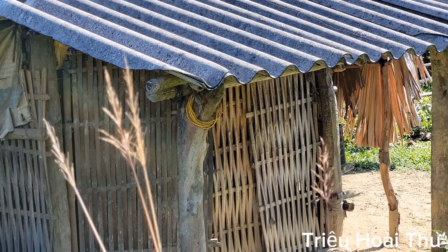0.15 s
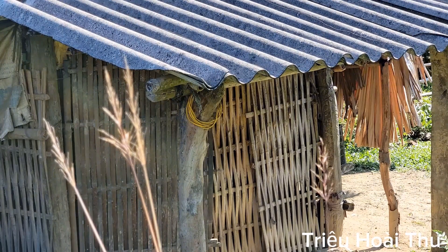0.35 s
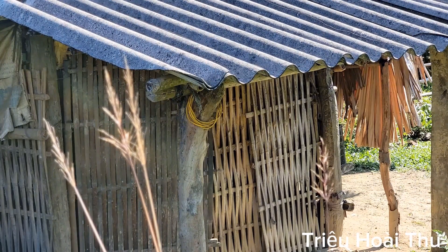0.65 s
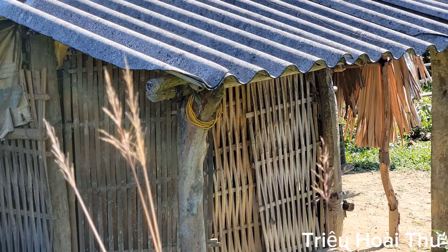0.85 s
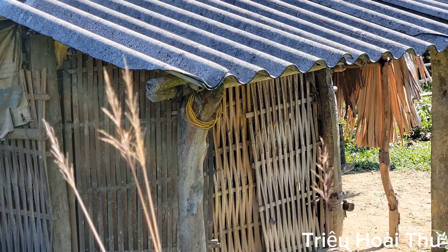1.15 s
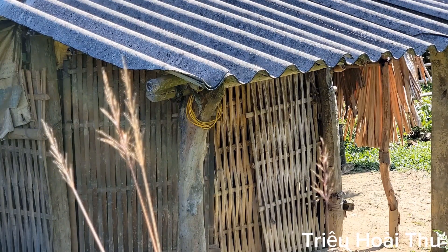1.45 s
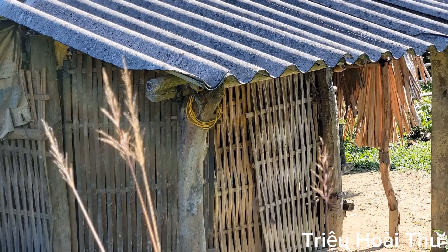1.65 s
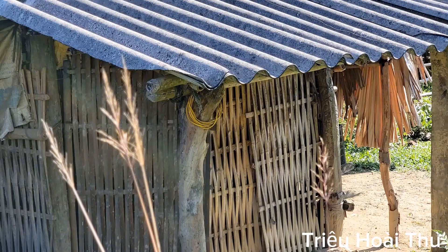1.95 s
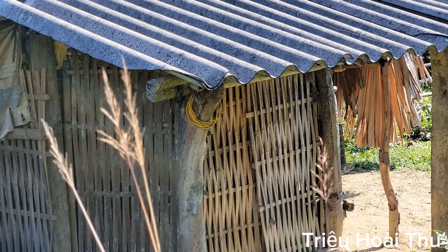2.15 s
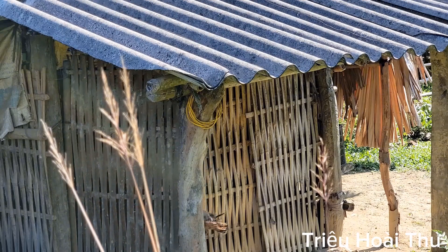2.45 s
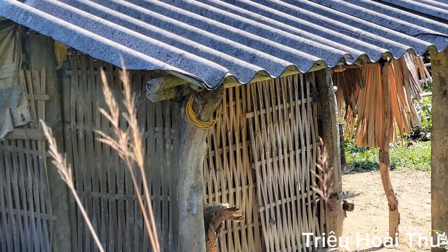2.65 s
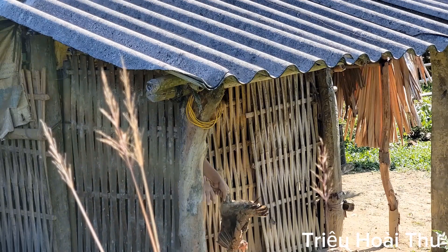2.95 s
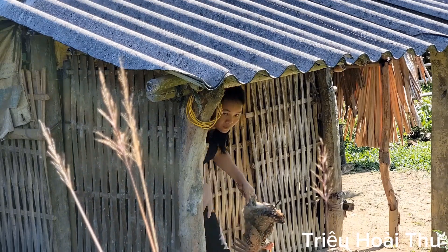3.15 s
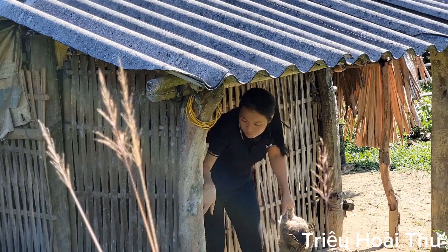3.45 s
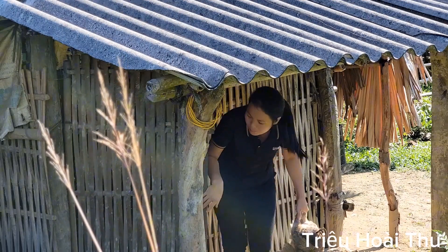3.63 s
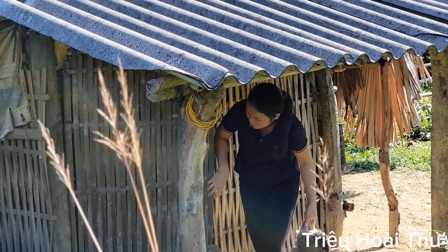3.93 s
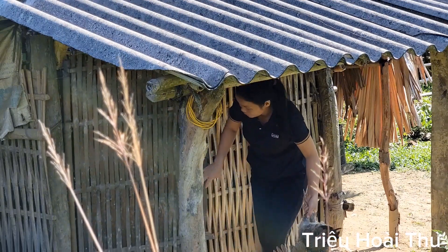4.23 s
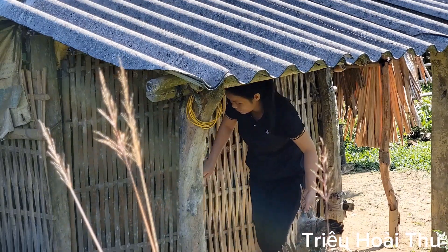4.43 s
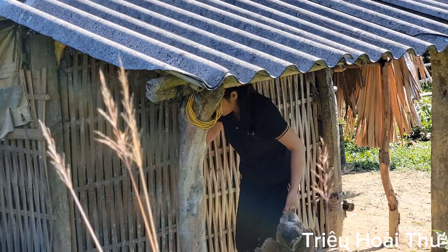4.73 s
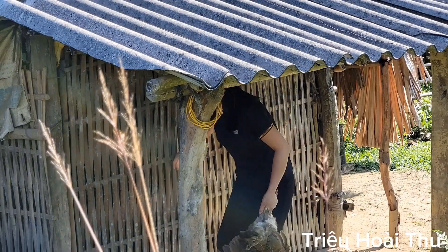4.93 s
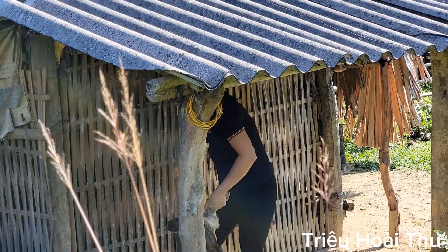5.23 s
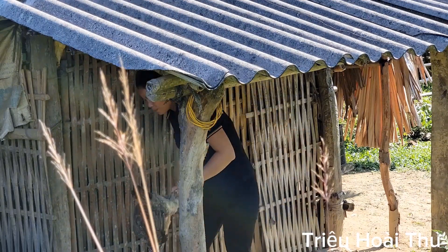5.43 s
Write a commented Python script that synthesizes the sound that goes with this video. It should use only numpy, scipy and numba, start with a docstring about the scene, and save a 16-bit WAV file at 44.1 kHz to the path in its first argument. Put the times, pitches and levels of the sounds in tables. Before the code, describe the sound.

A hen carried from a wicker hut squawks six times. A clipped rasp opens, then five drawn-out calls swell from scratchy noise into a clear nasal cry and mostly roughen again. Tiny dry rustles precede the last, loudest squawk, which is cut off at the end. Quick echoes off posts and sheet roof surround it; soft hiss, low rumble and faint insects lie beneath. The stereo microphone is fairly close outdoors.

```python
"""A hen carried out of a wicker hut squawks six times: pulses of uneven spacing ring her airway as a rasp,
a stack of whole-multiple partials makes the clear voice, and each squawk crossfades between the two.
Short puffs of noise rustle just before the last squawk, which splits into strong and weak cycles.
Single echoes off posts and a sheet roof and a noise tail for the hut follow hen and rustle;
throughout, coloured noise gives hiss and rumble, resonated noise gives insects and a swelling hum."""
import sys
import numpy as np
from scipy import signal
from scipy.fft import rfft, irfft
from scipy.io import wavfile
from numba import njit

SR = 44100
rng = np.random.default_rng(int(sys.argv[2]) if len(sys.argv) > 2 else 0)


def generate_wav(sig):
    """Save sig (samples, or channels by samples) to the path in sys.argv[1] as 16-bit PCM at SR."""
    pcm = np.round(np.clip(np.atleast_2d(sig).T, -1, 1) * 32767).astype(np.int16)
    wavfile.write(sys.argv[1], SR, pcm)


N = 246078

# one list a squawk: (time [s], pitch [Hz], level [dB], rasp over clear voice [dB], beak gape [0 shut, 1 wide])
SQUAWKS = [
    [(0, 575, -22.5, 30, 0.081), (.04, 572.7, -29, 35.5, 0.11), (.07, 557, -37, 30, 0.012)],
    [(.44, 568.3, -46.5, 25.5, 0.064), (.47, 615, -34, 30.5, .15), (.6, 624.3, -30, 23.5, 0.51),
     (.65, 611, -28, -6, 0.68), (.7, 596, -26, -10.5, .9), (.76, 616.7, -28, -11, 1.1),
     (.84, 602.2, -21.5, -17, 0.61), (.9, 589, -25, -17, 1), (.92, 609.3, -24.5, -6, .5),
     (1.04, 577, -27, 8.5, .5), (1.1, 588.5, -27.5, 16, 0.32), (1.14, 571, -36.5, 10.5, 0.0)],
    [(1.495, 595.4, -43, 22, 0.46), (1.55, 625.3, -31, 31, 0.44), (1.64, 588, -31.5, 9.5, .9),
     (1.68, 573, -28, -19.5, 1.2), (1.76, 573.1, -26, -30.5, 0.98), (1.82, 564.6, -23.5, -40, 0.86),
     (1.875, 556.5, -22.5, -34, 1.7), (1.895, 571.7, -26, -1.5, 1.0), (1.97, 564.3, -26.5, 4, .8),
     (2.04, 564.5, -22.5, 8, .4), (2.1, 558.7, -21.5, 20, 0.17), (2.16, 555.9, -26, 17, 0.14),
     (2.2, 548.5, -33.5, 9, 0.016)],
    [(2.605, 585.4, -40, 23.5, 0.21), (2.65, 655, -36.5, 17.5, .4), (2.76, 661.5, -31, 22, .6),
     (2.835, 594.2, -26.5, 6, .8), (2.855, 585, -27.5, -35, 1.7), (2.9, 591, -25.5, -43, 1.1),
     (2.96, 590.5, -25.5, -33.5, 1.4), (3.085, 571.7, -23, -26.5, 1), (3.11, 580, -26, 10.5, .8),
     (3.2, 563.7, -28.5, -7.5, .8), (3.27, 548.6, -28, 2, .5), (3.31, 533, -39, 3, 0.0)],
    [(3.74, 615, -44.5, 11.5, 0.55), (3.88, 662.2, -38, 4.5, .9), (4.01, 580.5, -30, 1.5, 1.0),
     (4.04, 569.8, -29, -19, 1.2), (4.1, 557.9, -28, -23, 1.2), (4.19, 558, -29, -38, 1.1),
     (4.26, 561.2, -28.5, -12, 1.1), (4.35, 551.4, -27, -14.5, 1), (4.41, 541, -30, -11.5, .9),
     (4.45, 529.2, -34.5, -0.5, .4), (4.465, 511.4, -34.5, 9.5, 0.0)],
    [(5.02, 522, -41.5, 28, .3), (5.12, 644.4, -33, 27.5, 0.77), (5.18, 694, -32, 19.5, .8),
     (5.24, 585.3, -28, 7.5, 0.96), (5.29, 553, -27, -5.5, 1.28), (5.305, 566, -20, -35, 0.69),
     (5.33, 566.2, -18.5, -46.5, 1.7), (5.38, 561.2, -19, -30, 0.85), (5.41, 557.2, -22.5, -6, 0.81),
     (5.44, 567.2, -18, -13.5, 1.24), (5.48, 559.2, -18.5, -10, 1.1), (5.52, 540.8, -16, -9.5, 0.72),
     (5.58, 555.3, -18, -26, 1)],
]
# lapses of the clear voice into rasp: (start [s], length [s], extra rasp [dB])
SLIPS = [(1.825, 0.027, 22.5), (2.99, 0.063, 13), (4.219, 0.017, 23), (4.295, 0.024, 10)]
# colour at COLOUR_HOLD_S, one row a squawk, as the hen is turned:
# (windpipe hum [dB], partials 1, 2, 3, 4, 5, 6 [dB each], upper partials [dB])
COLOUR = [(-17.5, -20, -13, -15, -1, -26, -7, -16), (-30, -18.5, -6.5, -9.5, -6, -21.5, -4, -18.5),
          (-22.5, -12, -8.5, -6, -5.5, -27, -8.5, -18.5),
          (-28.5, -34, -7.5, -6.5, -2.5, -11.5, -7.5, -15.5),
          (-7, -6.5, -12.5, -5.5, -6, -17.5, -4.5, -17.5), (-22.5, -21, -15, -5.5, -4, -22, -13.5, -23)]
# drift of that colour within the squawk: (same columns as COLOUR [dB/s])
COLOUR_DRIFT = [(-5, 2, 3.5, 5, 5, 5, 5, 5), (-52, -31.5, 35.5, -18, -19.5, -15, -2.5, -18),
                (-26, 15.5, 1, -1.5, -13, -60.5, -33, -22.5), (-25, 52, 6, -25, -8, -26.5, -35, 2.5),
                (-14.5, -1, 14, -2, 19.5, -46.5, -17, -2), (-26, 41, -60.5, 49, 3, -33, -25, -3)]
# gain from shut to wide beak: (partials 1, 2, 3, 4, 5, 6 [dB each], upper partials [dB])
GAPE_GAIN_DB = (-3.1, -6.5, 0, 1, -6.5, 1.5, 5.5)
# partials 7 and above: (frequency [Hz], level [dB])
UPPER_PARTIALS = [(4000, 2.5), (4700, 0.5), (5600, -2), (7000, -8.5), (8500, -8.5), (10000, -15.5),
                  (12000, -27), (15000, -30.5)]
# alternate strong and weak cycles: (time [s], depth [0-1])
DOUBLING = [(5.40, 0.0), (5.43, 0.25), (5.5, 0.07), (5.58, 0.16)]
# rasp offsets, one row a squawk: (chest [dB], gullet [dB], mouth [dB], beak hiss [dB], mouth shift [Hz])
RASP_COLOUR = [(-4, 3, 0, 5, 100.5), (3.5, 1.3, 0.7, 0.1, 38), (3, -2.5, 0, -2.2, 10),
               (-5, -3.8, -0.5, -0.5, 29.5), (8, -3.3, -0.9, -6, -93), (-17, -0.3, 0, -3.4, -32)]
# moving throat resonance: (time [s], centre [Hz])
THROAT = [(0, 1370), (.1, 1410), (.45, 1300), (.66, 1530), (.8, 1520), (.92, 1430), (1.08, 1420),
          (1.16, 1320), (1.5, 1350), (1.65, 1440), (2.0, 1520), (2.1, 1450), (2.22, 1370), (2.6, 1260),
          (2.66, 1390), (2.83, 1430), (3.12, 1480), (3.32, 1340), (3.74, 1180), (3.88, 1340), (4.02, 1410),
          (4.3, 1400), (4.46, 1490), (5.02, 1300), (5.12, 1390), (5.25, 1370), (5.41, 1580), (5.58, 1590)]
# moving mouth resonance: (centre, beak shut [Hz], centre, beak wide [Hz])
MOUTH_HZ = (3704, 3476)
# fixed mouth resonances: (centre [Hz], width per pass [Hz], level [dB])
FIXED_MOUTH = [(3080, 220, -2), (4800, 700, -13)]
# beak hiss resonances: (centre [Hz], width per pass [Hz], level [dB])
BEAK = [(6360, 3300, 6), (8280, 930, 1), (11600, 3500, -11), (14420, 3500, -9)]
# puffs before placement: (peak time [s], level [dB], t60 [s])
RUSTLE = [(4.676, -57.5, 0.04), (4.895, -54, 0.061), (4.9103, -44.5, 0.065), (4.9562, -51, 0.035)]
# rustle spectrum: (frequency [Hz], relative density [dB per Hz])
RUSTLE_COLOUR = [(290, -9), (500, -15.5), (2190, -12), (3150, -13.5), (3470, -4.5), (4050, -16),
                 (14000, -37)]
# direction of hen and rustle: (time [s], left over right [dB], left lag [samples])
SIDEWAYS = [(0, -2, -1.5), (.8, -0.5, -1), (1.3, -0.5, -1), (1.8, 1.5, 3.5), (2.2, -1, 0.5),
            (2.8, -0.5, 2.5), (3.3, -0.1, 2.5), (3.8, 0, 4), (4.3, -0.5, 3.5), (5.0, 0, 3),
            (5.58, -1, -0.2)]
# single reflections: (delay [s], level [dB], further delay on the left [samples])
ECHOES = [(.0021, -21.5, 6.0), (.0047, -34.5, -11), (.0083, -15, 15), (0.0155, -9, -5)]
# yard noise spectrum: (frequency [Hz], relative density [dB per Hz])
YARD = [(18, -35.5), (30, -4), (118, -2.5), (184, -13.5), (319, -14), (632, -19), (760, -17.5), (844, -24),
        (1910, -22.5), (3770, -28.5), (4780, -26), (5310, -31.5), (6380, -30.5), (16000, -49)]
# left-right likeness of yard noise: (frequency [Hz], likeness, clipped to 0-1)
LIKENESS = [(30, .88), (60, 0.87), (200, .8), (400, 0.26), (1000, -.1), (4000, -0.063), (12000, -1.2)]
# insect bands: (centre [Hz], first-pass width [Hz], level [dB], throb [dB])
INSECTS = [(4730, 150, -77.5, 4.5), (6520, 230, -75.5, 2)]
# low hum that swells: (time [s], level [dB])
HUM = [(0.0, -71.5), (3.88, -69.5), (4.1, -59), (5.58, -64.5)]

ATTACK_DB_PER_S, RELEASE_DB_PER_S = 895.5, 556.5   # outside a squawk's first and last points
VOICE_BREAK_DB_PER_S = 499   # rasp gains on clear voice in the release
UNSEAL_PER_S = 12            # gape opening during the attack
SLIP_RISE_S, SLIP_FALL_S = .006, .012
COLOUR_HOLD_S = 0.39         # time into a squawk at which COLOUR holds

PITCH_JITTER, CHAOS_JITTER = 0.0025, 0.013   # relative spread; the second scales with chaos
WAVER_DB = 1.5               # slow waver of partials 1-6
DROWN_DB = 10                # upper-partial loss at full chaos
NOTCH_HZ, NOTCH_WIDTH_HZ, NOTCH_DEPTH = 5784, 570, 0.51

PULSE_UNEVEN, PULSE_STRENGTH_SPREAD = .12, 0.23
AIR = .5                     # air noise between pulses, relative to pulse rms
SPUTTER_DB = 2.0
THROAT_WIDTH_HZ, WINDPIPE_WIDTH_HZ, MOUTH_WIDTH_HZ = 487, 120, 384   # per pass
GULLET_HZ, GULLET_WIDTH_HZ = 2094, 330
CHEST_HZ, CHEST_WIDTH_HZ, CHEST_DB = 370, 120, -37
SQUEAL_DB, SQUEAL_FLUTTER_DB, SQUEAL_WANDER, SQUEAL_CHOP_DEPTH = 0.5, 4.0, 0.026, 0.18
GULLET_DB, MOUTH_DB, BEAK_DB = (-13.5, -0.5), (-15, 4), (-30, -6.5)   # (shut, wide)

DIRECT_DB, HUT_DB, HUT_T60_S = -2.5, -13.5, 0.18
HUT_CUT_HZ, HUT_WIDE_HZ = 7000, 900
YARD_GAIN_DB = -64
HUM_HZ, HUM_WIDTH_HZ = 81, 10
BASS_CUT_HZ, TREBLE_CUT_HZ = 36.0, 16000


def clear_voice():
    """Regular vibration of the syrinx: whole multiples of one pitch, shaken as the rasp takes over."""
    hz, level, rough, gape, (_, *colour_db), _ = squawk_controls()
    *named_db, upper_db = [db + gain_db * (gape - 1) for db, gain_db in zip(colour_db, GAPE_GAIN_DB)]
    chaos = rough / (rough + 2 * level + 1e-12)
    jitter = (PITCH_JITTER + CHAOS_JITTER * chaos) * drift(50)
    phase = 2 * np.pi * np.cumsum(hz * (1 + jitter)) / SR
    out = np.zeros(N)
    for k, db in enumerate(named_db, 1):
        chaos_db = 8.29 * chaos * (k > 1) * drift(45)
        out += amp(db + WAVER_DB * drift(8.5) + chaos_db) * np.sin(k * phase + k * k)
    for k in range(7, 26):
        db = upper_db - DROWN_DB * chaos + at_hz(UPPER_PARTIALS, k * hz) + 3.13 * drift(24)
        out += amp(db) * np.sin(k * phase + k * k)
    # weaker alternate cycles: lines halfway between partials; the two lowest hardly take part
    steady = sum(amp(named_db[k - 1]) * np.sin(k * phase + k * k) for k in (1, 2))
    out += (out - steady) * 2 * in_time(DOUBLING)[0] * np.sin(phase / 2)
    highpass = signal.butter(6, 420, "high", fs=SR, output="sos")
    return np.sqrt(2) * level * signal.sosfilt(highpass, out)


def rasp():
    """Chaotic vibration: pulses of uneven spacing and strength ring windpipe, throat, mouth and beak."""
    pulse_hz, _, level, gape, (pipe_db, *_), (chest_db, *own_db, shift_hz) = squawk_controls()
    throat_hz, = in_time(THROAT)
    mouth_hz = opened(gape, *MOUTH_HZ) + shift_hz
    gape_pairs = (GULLET_DB, MOUTH_DB, BEAK_DB)
    gullet_db, mouth_db, beak_db = (db + opened(gape, *pair) for db, pair in zip(own_db, gape_pairs))
    pulses = uneven_pulses(pulse_hz)

    throat = amp(SPUTTER_DB * drift(30)) * rms_one(twice(pulses, throat_hz, THROAT_WIDTH_HZ))
    pipe = amp(pipe_db) * rms_one(twice(pulses, pulse_hz, WINDPIPE_WIDTH_HZ))
    chest = amp(CHEST_DB + chest_db) * rms_one(twice(pulses, CHEST_HZ, CHEST_WIDTH_HZ))
    gullet = rms_one(twice(pulses, GULLET_HZ, GULLET_WIDTH_HZ))
    gullet *= amp(gullet_db + SPUTTER_DB * drift(40))
    low = rms_one(throat + squeal(throat_hz, pulse_hz)) + pipe + chest + gullet

    mouth = twice(pulses, mouth_hz, MOUTH_WIDTH_HZ) * amp(SPUTTER_DB * drift(27))
    mouth += sputtering(pulses, FIXED_MOUTH)
    beak = sputtering(pulses + rng.standard_normal(N), BEAK)
    return level * (low + amp(mouth_db) * rms_one(mouth) + amp(beak_db) * rms_one(beak))


def uneven_pulses(pulse_hz):
    """One impulse a cycle, random in spacing and strength, with air noise between."""
    loose = 1 - np.clip(5.0 * in_time(DOUBLING)[0], 0, .92)   # strong-weak cycles pull pulses into step
    cycles = np.cumsum(pulse_hz * np.exp(PULSE_UNEVEN * loose ** 2 * drift(200))) / SR
    count = np.floor(cycles)
    pulses = np.diff(count, prepend=0) * (1 + PULSE_STRENGTH_SPREAD * loose * rng.standard_normal(N))
    pulses *= np.where(count % 2, loose, 2 - loose)
    return rms_one(pulses) + AIR * loose * rng.standard_normal(N)


def squeal(throat_hz, pulse_hz):
    """Second, unsteady oscillation on the throat resonance, modulated at the pulse rate into sidebands."""
    wandering_hz = throat_hz * (1 + SQUEAL_WANDER * drift(30))
    tone = np.sin(2 * np.pi * np.cumsum(wandering_hz) / SR)
    chop = 1 + SQUEAL_CHOP_DEPTH * np.cos(2 * np.pi * np.cumsum(pulse_hz) / SR)
    return tone * amp(SQUEAL_DB + SQUEAL_FLUTTER_DB * drift(25)) * chop


def sputtering(x, resonances):
    """Parallel resonances, each with its own random level flutter."""
    return sum(amp(db + SPUTTER_DB * drift(40)) * twice(x, hz, width_hz) for hz, width_hz, db in resonances)


def squawk_controls():
    """Per-sample pitch, clear and rasp gains, gape and colours; the two gains share one power."""
    t = np.arange(N) / SR
    hz, level_db, over_db, gape = in_time([row for rows in SQUAWKS for row in rows])
    starts, ends = np.transpose([(rows[0][0], rows[-1][0]) for rows in SQUAWKS])
    which = np.searchsorted((ends[:-1] + starts[1:]) / 2, t)   # switch midway between squawks
    age, late = t - starts[which], t - ends[which]
    first_db, last_db = np.transpose([(rows[0][2], rows[-1][2]) for rows in SQUAWKS])[:, which]
    level_db = np.where(late > 0, last_db - RELEASE_DB_PER_S * late, level_db)
    level_db = np.where(age < 0, first_db + ATTACK_DB_PER_S * age, level_db)
    gape = gape + UNSEAL_PER_S * np.clip(age, -.06, 0)
    over_db = over_db + VOICE_BREAK_DB_PER_S * np.clip(late, 0, .1)
    for start_s, length_s, db in SLIPS:
        ramp = np.minimum((t - start_s) / SLIP_RISE_S, (start_s + length_s - t) / SLIP_FALL_S)
        over_db += db * np.clip(1 + ramp, 0, 1)
    clear = amp(level_db) / np.sqrt(1 + amp(2 * over_db))
    rough = amp(level_db) / np.sqrt(1 + amp(-2 * over_db))
    drift_s = np.maximum(age, 0) - COLOUR_HOLD_S
    colour_db = np.transpose(COLOUR)[:, which] + np.transpose(COLOUR_DRIFT)[:, which] * drift_s
    return hz, clear, rough, gape, colour_db, np.transpose(RASP_COLOUR)[:, which]


def rustle():
    """Short dry puffs: coloured noise under fast-rising, exponentially decaying envelopes."""
    t = np.arange(N) / SR
    shape = np.zeros(N)
    for peak_s, db, t60_s in RUSTLE:
        rise = np.clip((t - peak_s) / 0.0029 + 1, 0, 1)
        shape += amp(db - 60 * np.maximum(t - peak_s, 0) / t60_s) * rise
    return shape * coloured(RUSTLE_COLOUR, size=1)[0][0]


def placed(x):
    """Direct sound with level and arrival offsets, single echoes, then the hut's short noise tail."""
    pan_db, lag = in_time(SIDEWAYS)
    n = np.arange(N)
    out = np.array([np.interp(n - lag / 2, n, x), np.interp(n + lag / 2, n, x)])
    for delay_s, db, left_lag in ECHOES:
        echo = [np.interp(n - delay_s * SR - late, n, x, left=0) for late in (left_lag, 0)]
        out += amp(db) * np.array(echo)
    t = np.arange(SR // 2) / SR
    tail = rng.standard_normal((2, len(t))) * amp(-60 * t / HUT_T60_S) * (t > .012)
    mid, side = signal.lfilter(*signal.butter(1, HUT_CUT_HZ, fs=SR), tail)
    # long waves reach both channels alike
    side = signal.lfilter(*signal.butter(2, HUT_WIDE_HZ, "high", fs=SR), side)
    tail = np.array([mid + side, mid - side]) / np.sqrt(2 * np.sum(mid ** 2))
    reverb = signal.fftconvolve(x[None], tail, axes=1)[:, :N]
    out = amp(DIRECT_DB) * out + amp(HUT_DB) * reverb
    return out * amp([pan_db / 2, -pan_db / 2])


def yard():
    """Rumble and hiss, alike in both channels in the bass, plus throbbing insect bands and a hum."""
    (mid, side), hz = coloured(YARD, size=2)
    alike = np.clip(at_hz(LIKENESS, hz), 0, 1)
    mid = irfft(rfft(mid) * np.sqrt(1 + alike), N)
    side = irfft(rfft(side) * np.sqrt(1 - alike), N)
    out = amp(YARD_GAIN_DB) * np.array([mid + side, mid - side])
    for centre_hz, width_hz, db, throb_db in INSECTS:
        for channel in out:
            band = resonance(rng.standard_normal(N), centre_hz, width_hz)
            song = resonance(band, centre_hz, 2 * width_hz)
            channel += amp(db + throb_db * drift(25)) * rms_one(song)
    hum = resonance(resonance(rng.standard_normal(N), HUM_HZ, HUM_WIDTH_HZ), HUM_HZ, 30)
    return out + amp(in_time(HUM)[0]) * rms_one(hum)


def amp(db):
    """dB to gain."""
    return 10 ** (np.asarray(db) / 20)


def rms_one(x):
    """Scale to rms 1."""
    return x / np.sqrt(np.mean(x ** 2) + 1e-20)


def in_time(rows):
    """Columns of a timed table as sample curves."""
    s, *columns = np.transpose(rows)
    return [np.interp(np.arange(N) / SR, s, c) for c in columns]


def at_hz(points, hz):
    """Read a spectrum on a log-frequency axis."""
    point_hz, value = np.transpose(points)
    return np.interp(np.log(hz), np.log(point_hz), value)


def opened(gape, shut, wide):
    """Linear in gape between the shut and wide settings."""
    return shut + (wide - shut) * gape


def drift(rate_hz):
    """Random curve of rms 1: noise through two equal poles at rate_hz, run at SR / 20."""
    r = np.exp(-40 * np.pi * rate_hz / SR)
    noise = rng.standard_normal(N // 20 + 2002)
    slow = signal.lfilter([1], [1, -2 * r, r * r], noise)[2000:]   # drop the filter's start-up
    return np.interp(np.arange(N) / 20, np.arange(len(slow)), rms_one(slow))


def coloured(spectrum, size):
    """Noise shaped to a spectrum, rms 1 overall, and its frequency axis."""
    hz = np.maximum(np.arange(N // 2 + 1) * SR / N, 1)
    white = rfft(rng.standard_normal((size, N)))
    return rms_one(irfft(white * amp(at_hz(spectrum, hz)), N)), hz


@njit
def resonate(x, turn, r):
    """Two-pole resonance of top gain 1 whose centre (radians a sample) may move."""
    y = np.zeros(len(x))
    for i in range(2, len(x)):
        drive = (1 - r * r) / 2 * (x[i] - x[i - 2])
        y[i] = drive + 2 * r * np.cos(turn[i]) * y[i - 1] - r * r * y[i - 2]
    return y


def resonance(x, hz, width_hz):
    """Resonance given in Hz."""
    return resonate(x, 2 * np.pi * hz / SR * np.ones(N), np.exp(-np.pi * width_hz / SR))


def twice(x, hz, width_hz):
    """Two equal resonances in series: steeper skirts."""
    return resonance(resonance(x, hz, width_hz), hz, width_hz)


def scene():
    """Hen, with a treble dip, and rustle at the hut door; yard around."""
    hen = clear_voice() + rasp()
    hen = hen - NOTCH_DEPTH * resonance(hen, NOTCH_HZ, NOTCH_WIDTH_HZ)
    return placed(hen + rustle()) + yard()


def record(dry):
    """The microphone drops the deepest bass; the top is cut steeply."""
    dry = signal.sosfilt(signal.butter(2, BASS_CUT_HZ, "high", fs=SR, output="sos"), dry)
    return signal.sosfilt(signal.cheby2(16, 60, TREBLE_CUT_HZ, fs=SR, output="sos"), dry)


dry = scene()
out = record(dry)
generate_wav(out)
```